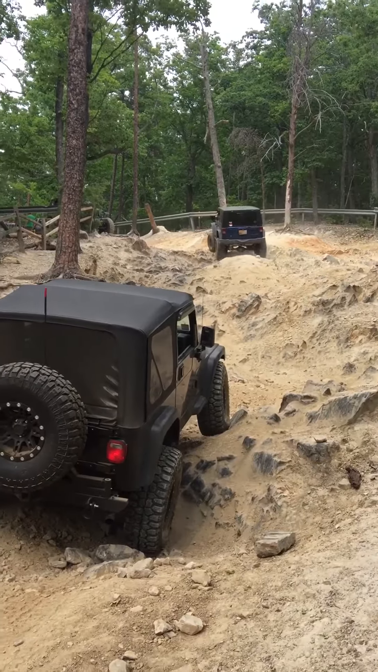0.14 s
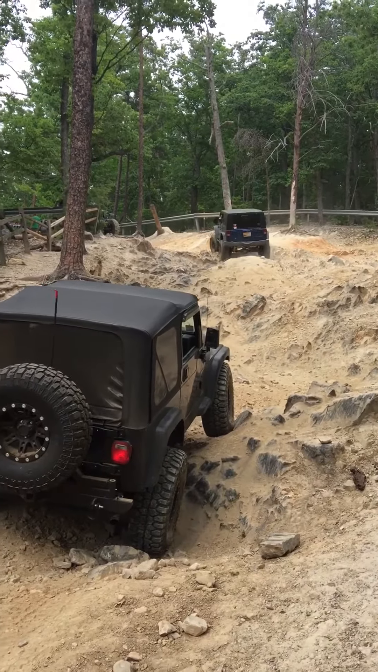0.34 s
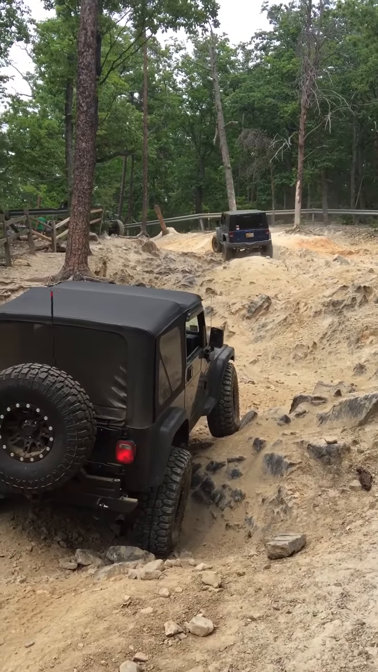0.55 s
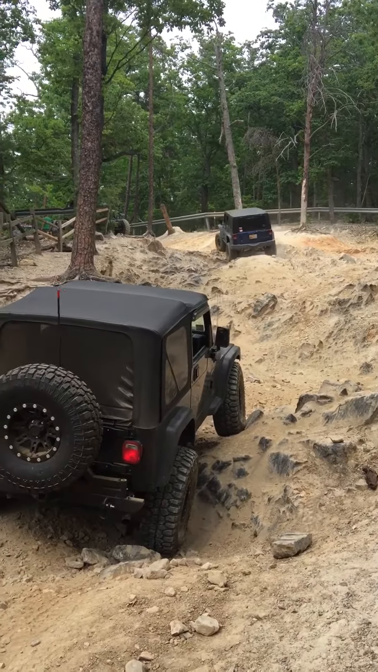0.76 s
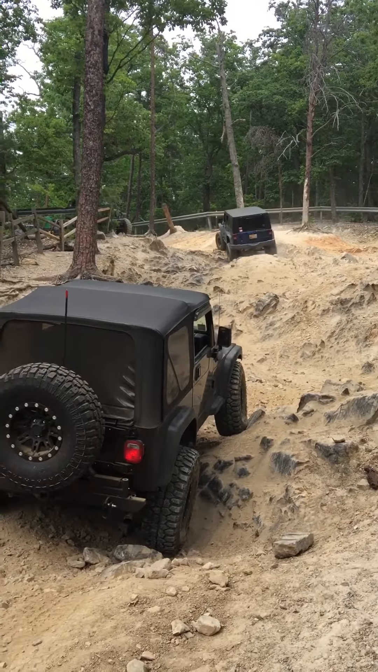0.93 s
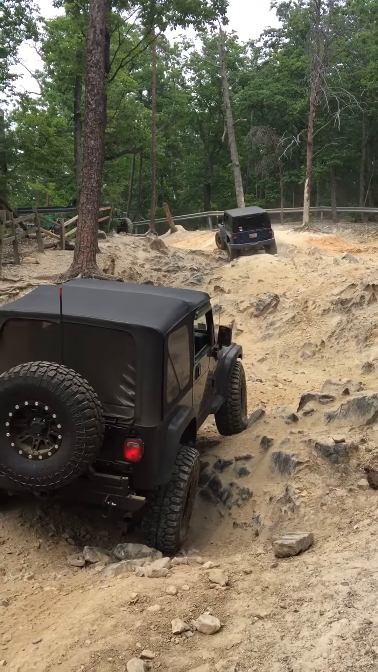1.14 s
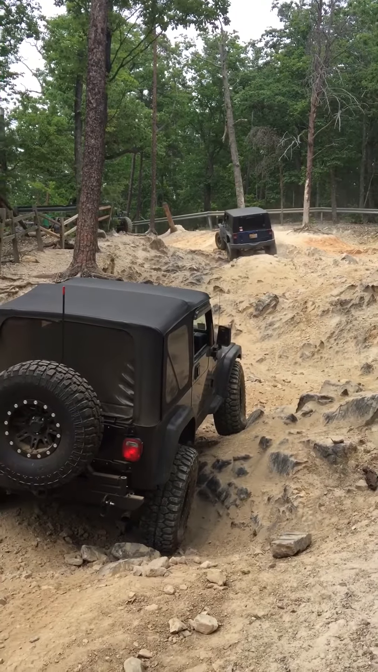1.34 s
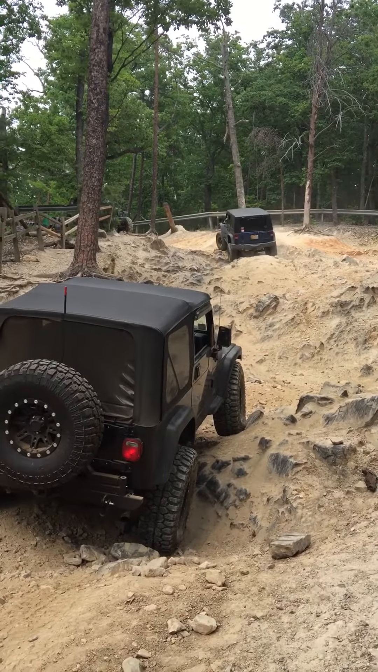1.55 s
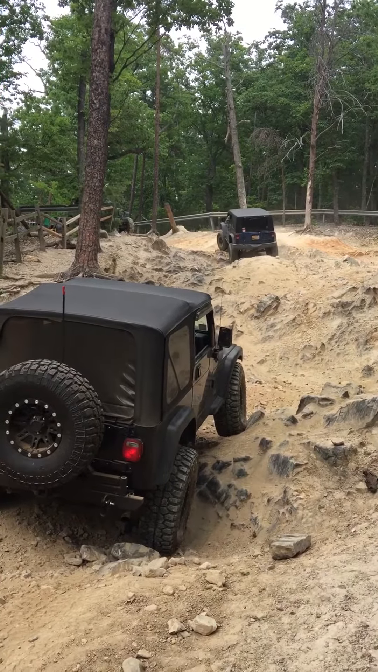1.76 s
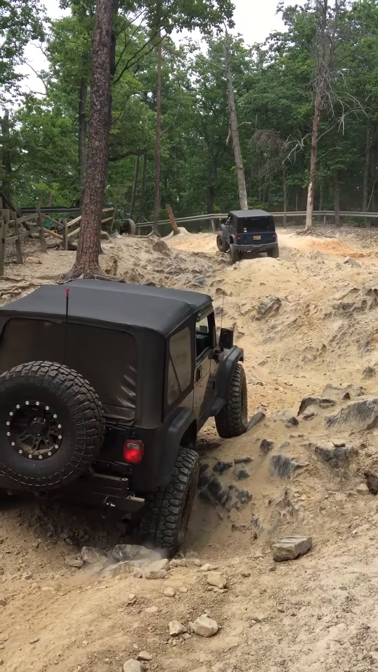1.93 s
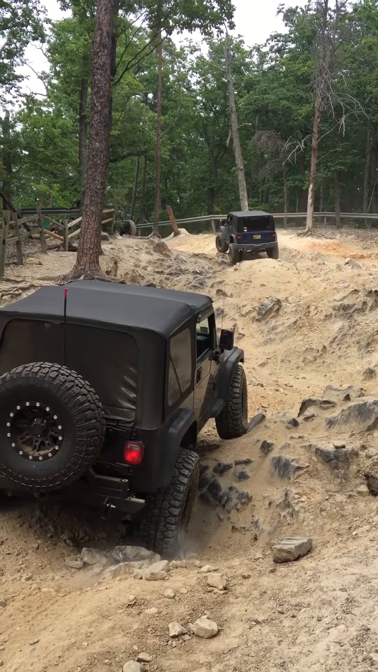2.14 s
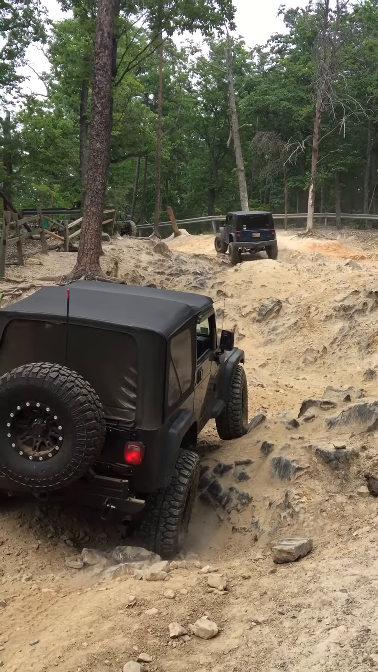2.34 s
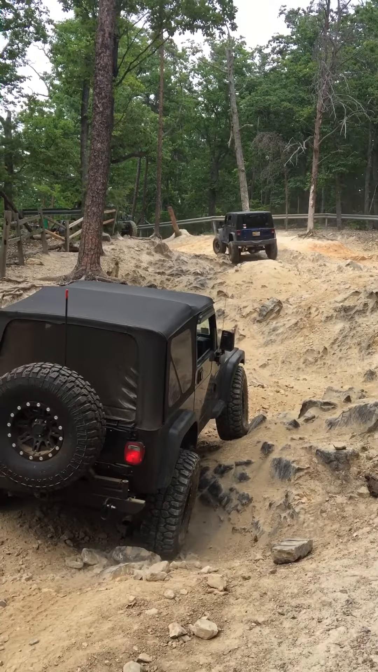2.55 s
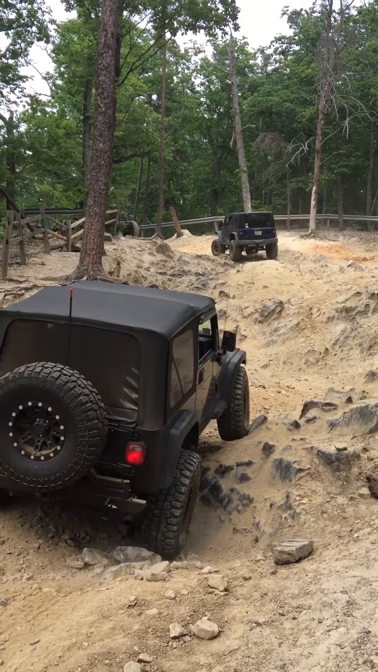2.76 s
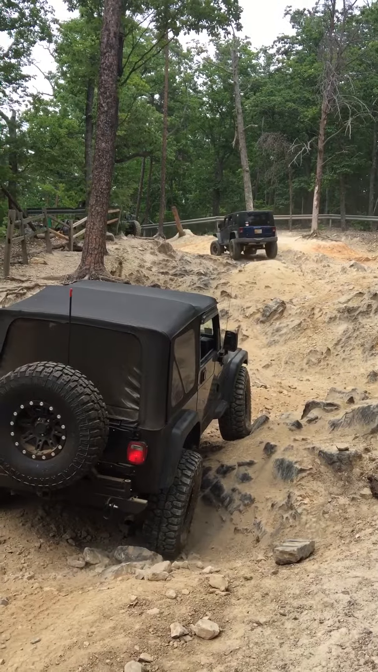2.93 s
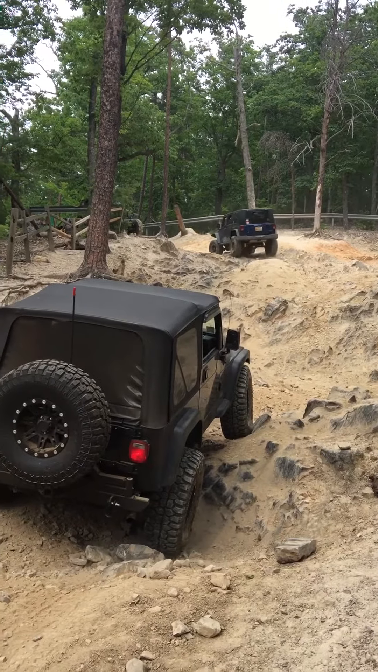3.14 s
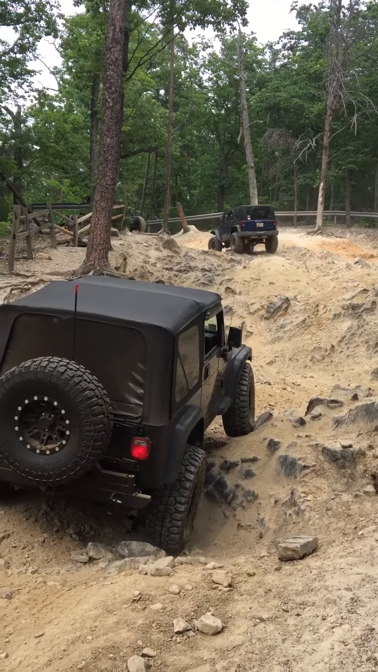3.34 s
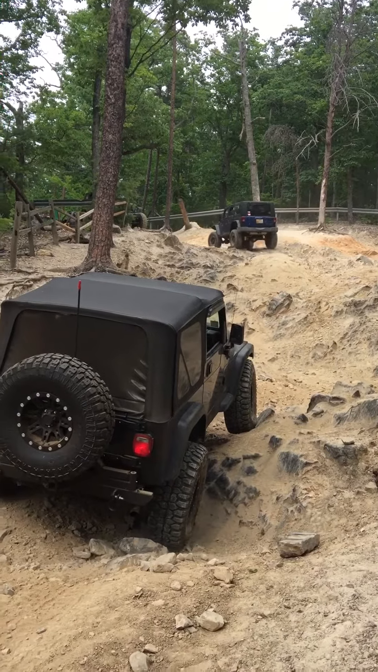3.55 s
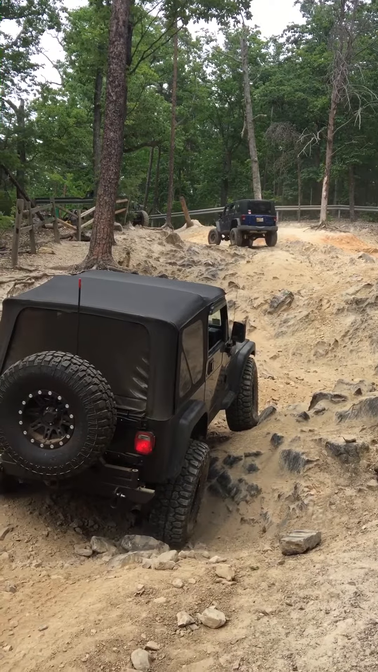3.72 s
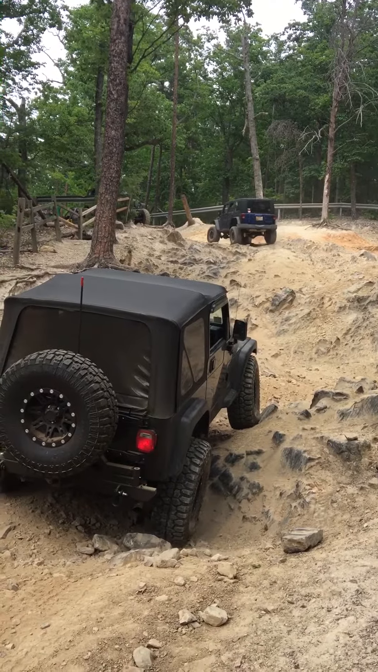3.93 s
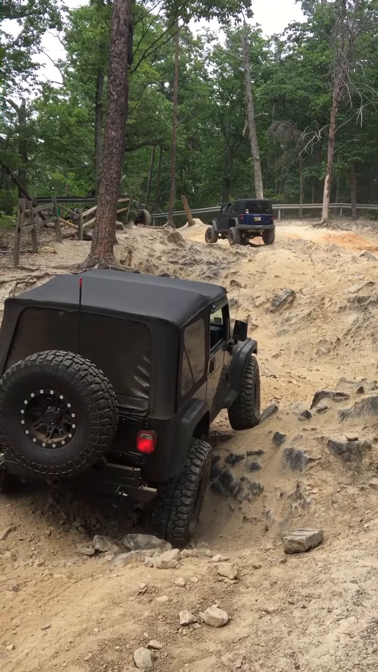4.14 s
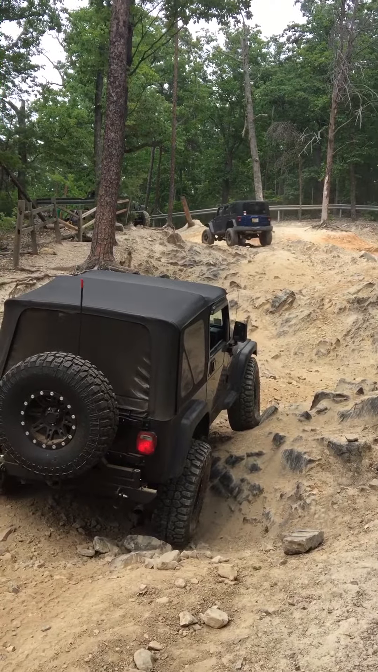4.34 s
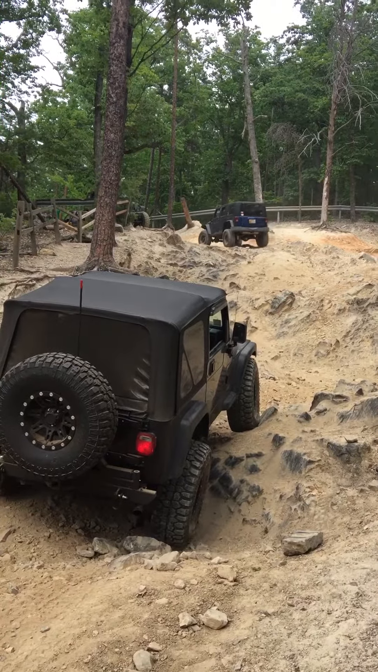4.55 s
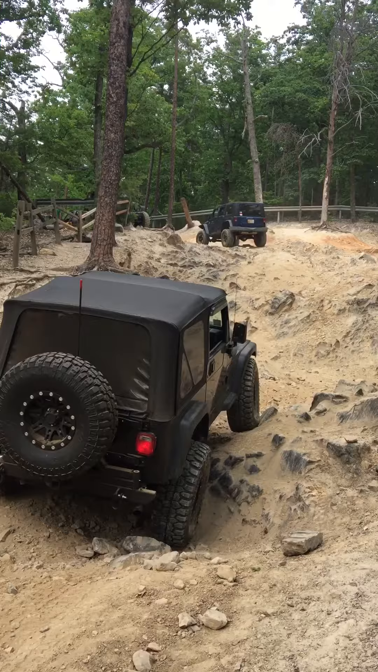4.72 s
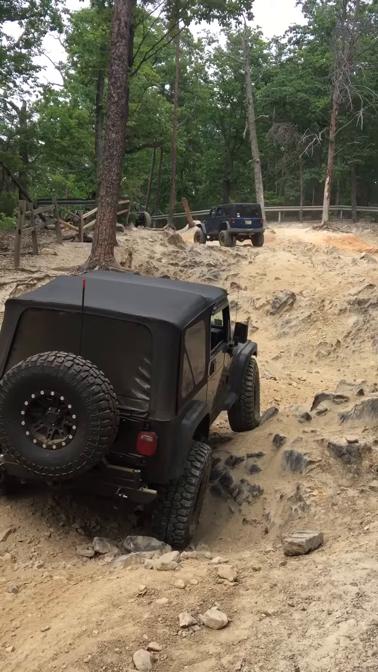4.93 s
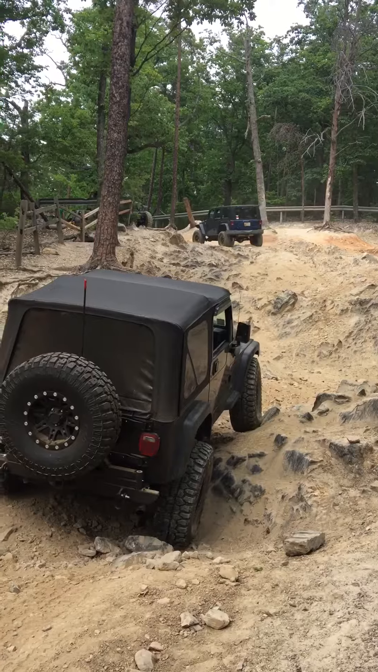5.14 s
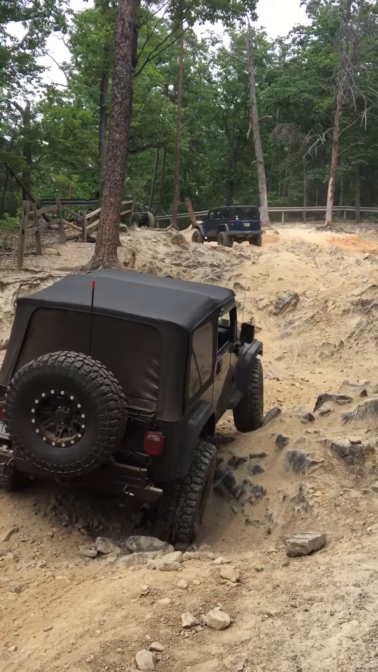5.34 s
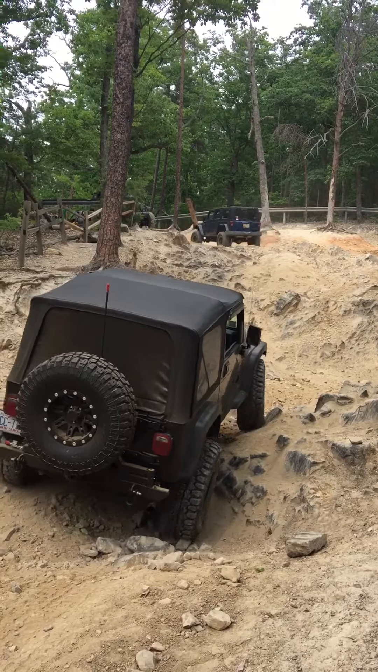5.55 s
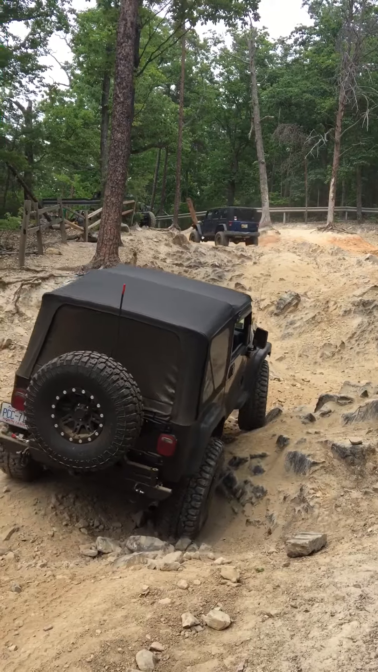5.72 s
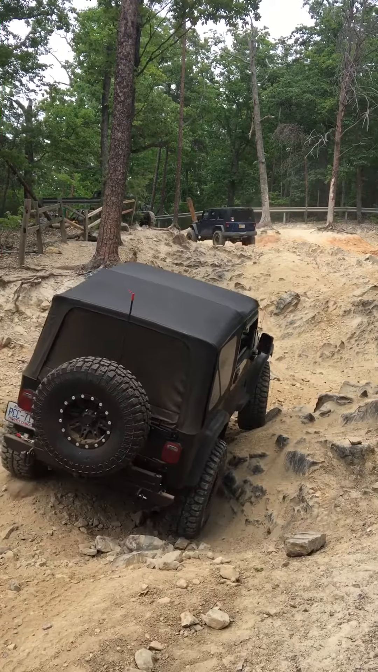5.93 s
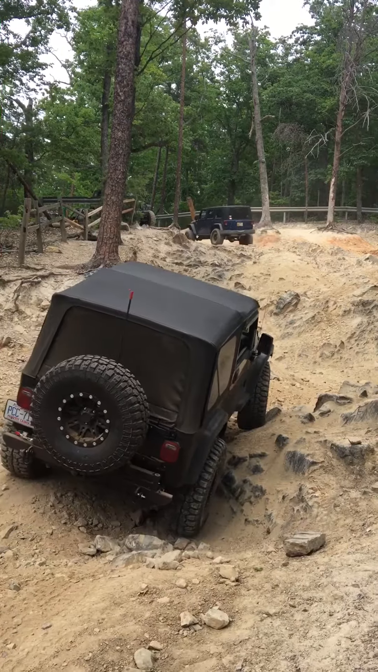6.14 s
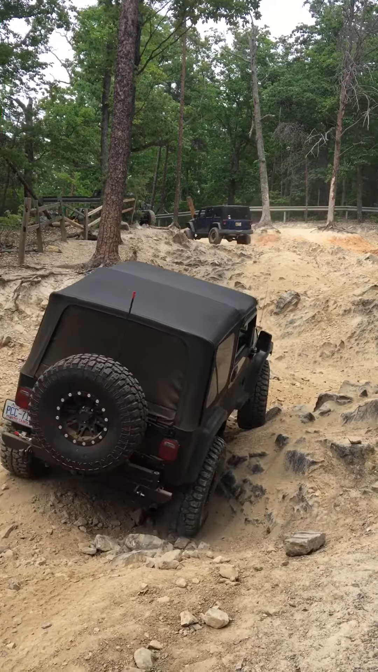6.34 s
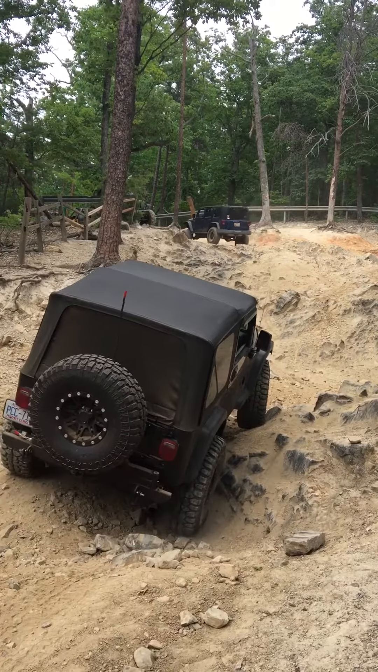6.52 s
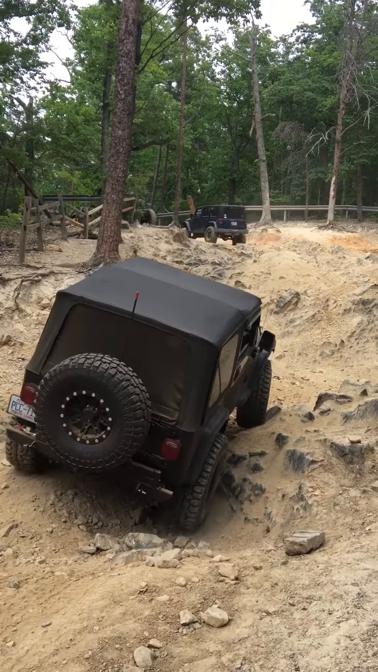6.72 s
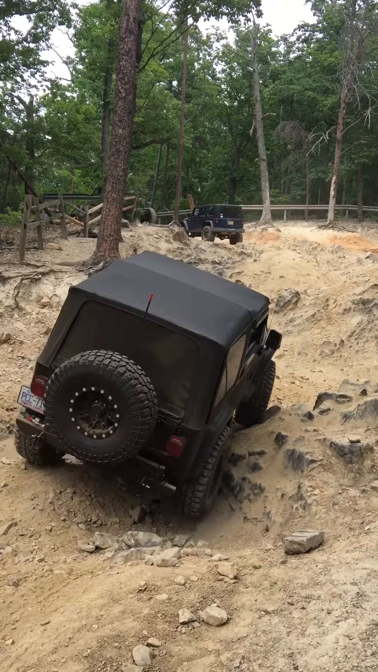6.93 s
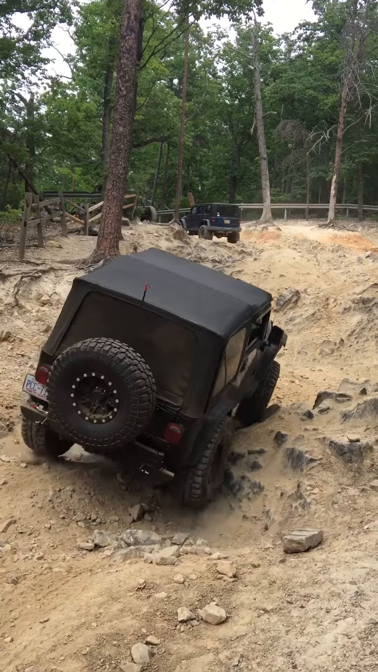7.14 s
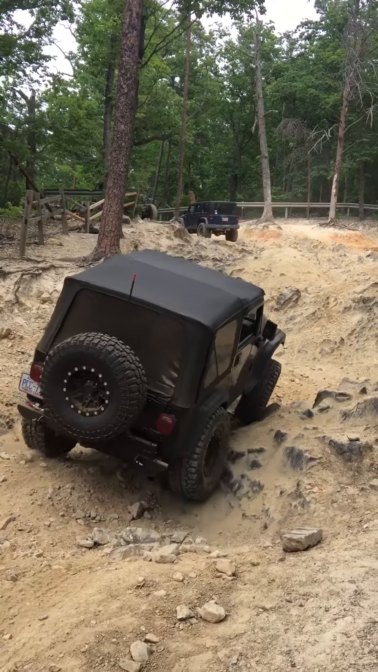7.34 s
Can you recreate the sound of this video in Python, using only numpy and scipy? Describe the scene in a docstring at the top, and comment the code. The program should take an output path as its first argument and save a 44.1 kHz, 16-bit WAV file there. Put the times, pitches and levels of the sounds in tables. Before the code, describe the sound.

An off-road vehicle's six-cylinder engine runs low and stalls within the first second, close by, while the drivetrain settles with small clunks. At about 1.3 seconds the starter bangs in and cranks with a grinding whine. The engine coughs with deep thumps around 1.9 seconds and catches; the starter races, then whines down, chirping until about 4 seconds. The engine rises gently to 3 seconds and sinks to idle, with a booming exhaust and clattering valves. A clunk and a tyre scrape come near 4.7 seconds. From 5.4 seconds the revs climb, peaking around 6.5, as grit crackles and tyres grind over stone, with knocks near 5.9. The engine bogs down after 7 seconds amid more clunks and scraping. Faint, high brake squeaks sound at about 6.5 and 7.3 seconds. Behind lies a faint forest hush, and the rocky slope returns a short, dull echo.

```python
"""A rocky slope in quiet forest, one small microphone close to a six-cylinder off-roader.
The engine stalls and the drivetrain clunks as it settles. The starter bangs in, cranks, overruns
and whines down while the engine catches, revs, idles and revs again. Firing pulses boom in the
exhaust pipe, valves clatter, tyres grind over stone and, near the end, a brake squeaks.
Rocks and trees send a short, dull echo back to the microphone."""
import sys
import numpy as np
from scipy import signal
from scipy.fft import rfft, irfft, next_fast_len
from scipy.io import wavfile
from scipy.ndimage import uniform_filter1d, map_coordinates

SR = 44100
rng = np.random.default_rng(int(sys.argv[2]) if len(sys.argv) > 2 else 0)


def bounce(signal):
    """Save signal as a 16-bit WAV file at the path given by the first command-line argument."""
    frames = np.transpose(np.atleast_2d(signal))
    limited = np.clip(frames, -1, 1)
    pcm = np.round(limited * 32767).astype(np.int16)
    wavfile.write(sys.argv[1], SR, pcm)


N = 325458

# each cylinder's departure from the mean exhaust pulse: fraction
CYLINDER_IMBALANCE = [0.059, 0.14, -0.28, 0.035, 0.055, -0.2]
# the starter labouring over one compression: t/s, whine f/Hz, gear level/dB
COMPRESSION = [(1.32, 2300, -46), (1.39, 3000, -36.5), (1.46, 3620, -40.5), (1.51, 3780, -43),
               (1.56, 3380, -30.5), (1.62, 2890, -31)]
RELEASE_S = 2.36  # the key is let go


def amp(db):
    """Decibels to gain."""
    return 10 ** (np.asarray(db) / 20)


def unit(x):
    """Scale to rms 1."""
    return x / np.sqrt(np.mean(x ** 2) + 1e-20)


def clock():
    """The time of each sample."""
    return np.arange(N) / SR


def curves(rows):
    """One value per sample for each column after the time."""
    times, *columns = np.transpose(rows)
    return [np.interp(clock(), times, column) for column in columns]


def during(rows, fade):
    """1 while a table lasts, fading to 0 outside it."""
    start, end = rows[0][0], rows[-1][0]
    return np.interp(clock(), [start - fade, start, end, end + fade], [0, 1, 1, 0])


def after(s, fade):
    """0, then rising to 1 by time s."""
    return np.interp(clock(), [s - fade, s], [0, 1])


def swell(s, length):
    """A bell-shaped rise and fall of height 1 around time s."""
    return np.exp(-((clock() - s) / length) ** 2)


def wobble(rate):
    """A smooth random curve, rate knots a second."""
    return map_coordinates(rng.standard_normal(int(N * rate / SR) + 4), [clock() * rate])


def filtered(x, response):
    """x through a complex frequency response."""
    size = next_fast_len(N + SR // 2)
    return irfft(rfft(x, size) * response(np.fft.rfftfreq(size, 1 / SR)), size)[:N]


def colour(points):
    """The response through (f/Hz, level/dB) points on a log axis."""
    f, db = np.transpose(points)
    return lambda hz: amp(np.interp(np.log(hz + 1), np.log(f), db, left=-120, right=-120))


def resonances(modes):
    """The response of (f/Hz, width/Hz, level/dB) modes, alternating in sign as along a pipe."""
    return lambda f: sum((-1) ** k * amp(db) * 1j * f * width / (hz * hz - f * f + 1j * f * width)
                         for k, (hz, width, db) in enumerate(modes))


def noise(response):
    """Coloured noise of rms 1."""
    return unit(filtered(rng.standard_normal(N), response))


def band(x, hz, spread):
    """x through one broad resonance, at rms 1."""
    edges = np.clip([hz / (1 + spread), hz * (1 + spread)], 20, SR / 2 - 100)
    return unit(signal.lfilter(*signal.butter(1, edges, "band", fs=SR), x))


def add(track, s, sound):
    """Mix a sound into a track from time s."""
    part = track[max(round(s * SR), 0):][:len(sound)]
    part += sound[:len(part)]


def metallic(x, ring_db, t60):
    """x plus its ring in many small steel parts, at rms 1."""
    t = np.arange(SR // 8) / SR
    tail = rng.standard_normal(len(t)) * amp(-60 * t / t60)
    return unit(x + amp(ring_db) * signal.fftconvolve(x, tail / np.linalg.norm(tail))[:N])


def taps(turns, per_turn, scatter_db, decay):
    """An envelope of mean 0 from sharp, regular taps of unequal force."""
    hits = np.diff(np.floor(turns * per_turn), prepend=0) * amp(scatter_db * rng.standard_normal(N))
    envelope = signal.lfilter([1], [1, -np.exp(-1 / (decay * SR))], hits)
    return envelope - uniform_filter1d(envelope, SR // 5)


def exhaust(firing_hz, firings, order_dbs, load_db):
    """Even firing gives the drone; unequal cylinders add a lope that rings in the pipe."""
    # exhaust pipe modes: f/Hz, width/Hz, level/dB
    pipe_modes = [(60.29, 4.9, 0), (114.8, 71.3, -3.5), (151.6, 19, 7), (185, 13, -5.5), (277.5, 14, -12),
                  (313.5, 51.5, -21), (434.8, 88, -26), (572, 66, -24)]
    # harmonics above the drone: firing order, level/dB
    upper_orders = [(4, -1.5), (5, 6), (6, -8), (7, -12.5)]
    # uneven firing as the engine bogs down: t/s, length/s, extra pulse scatter
    stumbles = [(2.052, 0.046, 0), (7.2, 0.23, 0.37)]
    pipe = lambda f: resonances(pipe_modes)(f) / (1 + (f / 400) ** 2)  # the muffler swallows treble
    grid_hz = np.arange(1000.)
    passed = lambda k: np.interp(k * firing_hz, grid_hz, pipe(grid_hz))
    phase = 2 * np.pi * firings
    drone = sum(amp(db) * np.sqrt(2) * np.cos(k * phase + np.angle(passed(k)))
                for k, db in enumerate(order_dbs, 1))
    upper = sum(amp(db + 9.5 + wobble(18)) * np.real(passed(k) * np.exp(1j * k * phase))
                for k, db in upper_orders)
    scatter = 0.045 + sum(size * swell(s, length) for s, length, size in stumbles)
    fired = np.flatnonzero(np.diff(np.floor(firings)))
    pulses = np.zeros(N)
    pulses[fired] = np.resize(CYLINDER_IMBALANCE, len(fired))
    pulses[fired] += scatter[fired] * rng.standard_normal(len(fired))
    lope = unit(filtered(pulses, pipe))
    gas = noise(resonances([(268.7, 13.8, 0), (198.5, 20, 0)]))  # the gas stream sounds the pipe too
    return drone * amp(0.63 * wobble(16)) + amp(load_db) * (upper + lope + amp(-10.5) * gas)


def engine_bay(firing_hz, firings, clatter_db, hiss_db):
    """Valves tap with the crank and ring the block; fan and intake hiss, and whistle at high revs."""
    # spectra of valve clatter and of fan and intake air: f/Hz, level/dB
    clatter_spectrum = [(200, -9), (330, 1.5), (470, 6.5), (640, 4.5), (850, -0.5), (1450, 1), (2800, -2.5),
                        (3500, -8.5), (5000, -50), (8000, -46)]
    hiss_spectrum = [(2500, -27), (3500, 0.5), (4500, 1), (4950, -7.5), (5700, -1), (6600, 1), (7600, -4),
                     (9400, -5.5), (10300, -10), (11500, -8.5), (15800, -18)]
    # resonances of the block and of the intake: f/Hz, width/Hz, level/dB
    block_modes = [(640, 110, 9), (976, 34, -4.5), (1226, 50, -5), (1400, 130, -7), (2380, 100, -10)]
    intake_modes = [(1237, 34, 2), (1408, 35, -3.5), (6280, 99, -12), (6760, 120, -9.5)]
    phase = 2 * np.pi * firings
    beat = 1 + 0.11 * np.cos(phase) + 0.049 * np.cos(phase / len(CYLINDER_IMBALANCE))
    valves = taps(firings, per_turn=2, scatter_db=4.0, decay=0.0056)
    steel = metallic(noise(colour(clatter_spectrum)), ring_db=-4.5, t60=0.052)
    block = amp(-6.5) * noise(resonances(block_modes))
    clatter = amp(clatter_db - 2.5) * (steel + block) * (1 + 0.5 * valves)
    hiss = amp(hiss_db) * noise(colour(hiss_spectrum)) * (1 + 0.4 * valves)
    whistle = amp(-51.5) * (firing_hz / 80) ** 4 * noise(resonances(intake_modes))
    return beat * (clatter + hiss + whistle)


def engine():
    """Speed, effort and throttle drive exhaust and engine bay, first stalling, then running again."""
    # the engine stalling, then under its own power: t/s, firing f/Hz, effort level/dB
    stall = [(0, 41.9, -45.5), (.32, 42, -48.5), (.46, 36.83, -59), (.8, 31.35, -77)]
    run = [(2.12, 39.67, -35.5), (2.24, 47.25, -32.5), (2.88, 54.9, -33), (3.09, 56.2, -32),
           (3.36, 53.1, -32.5), (3.95, 45.54, -35), (4.21, 43.4, -37), (5.0, 43.93, -35.5),
           (5.23, 40.44, -38), (5.37, 44.04, -35.5), (5.77, 57.84, -29.5), (6.12, 73.6, -29),
           (6.32, 80.45, -28.5), (6.47, 84.04, -28.5), (6.63, 80.76, -28), (6.85, 73.4, -29.5),
           (7.01, 66.17, -32), (7.14, 53.4, -38.5), (7.25, 43.2, -38.5), (7.38, 39.96, -43)]
    # the drone ahead of the tailpipe: firing order, cruising level/dB, dB per dB of effort
    drone_orders = [(1, -26.5, 3), (2, -21, 1), (3, -27.5, 0.63)]
    # the tailpipe booms as an order passes 150 Hz: f/Hz, gain/dB
    tailpipe = [(30, 17), (86, -7.5), (108, 1.5), (130, 2.5), (142, 2.5), (151, 7), (162, -1.5), (170, -3),
                (196, -9), (225, -25.5), (300, -15)]
    # the engine bay running down: t/s, clatter level/dB, hiss level/dB
    bay_dying = [(0, -59.5, -71.5), (.55, -55.5, -72.5), (.72, -62, -76), (1.2, -67, -83)]
    # the throttle, heard as intake hiss: t/s, level/dB
    throttle = [(2.44, -51), (2.9, -55.5), (3.6, -58), (4.1, -64), (4.55, -66.5), (5.15, -67), (5.4, -58.5),
                (5.75, -57), (6.45, -52), (7.08, -57.5), (7.26, -63.5)]
    cruise_db, idle_hz, half_throttle_db = -30, 43, -59
    firing_hz, level_db = curves(list(stall) + list(run))
    firings = np.cumsum(firing_hz) / SR
    effort_db = level_db - cruise_db
    caught = after(2.12, fade=0.15)
    blend = lambda stalling, running: stalling + caught * (running - stalling)

    _, stall_db = curves(stall)
    order_dbs = []
    for stall_offset_db, (order, db, growth) in zip([-14, 3, -16], drone_orders):
        boom_db = 20 * np.log10(colour(tailpipe)(order * firing_hz))
        order_dbs.append(blend(stall_db + stall_offset_db, db + growth * effort_db + boom_db))
    load_db = blend(stall_db - 5.5, -34 + 0.59 * effort_db)

    dying_clatter_db, dying_hiss_db = curves(bay_dying)
    throttle_db, = curves(throttle)
    clatter_db = -45 + 2.4 * np.log2(firing_hz / idle_hz) + 0.33 * (throttle_db - half_throttle_db)
    bay = engine_bay(firing_hz, firings, blend(dying_clatter_db, clatter_db),
                     blend(dying_hiss_db, throttle_db))
    return exhaust(firing_hz, firings, order_dbs, load_db) + bay


def forest():
    """A faint, low, steady hush around the microphone."""
    # forest ambience: f/Hz, level/dB
    spectrum = [(35, 8), (80, 13), (200, 3), (420, -5), (700, -10), (1500, -30.5), (5000, -23.5),
                (15800, -40)]
    return amp(-54.5) * noise(colour(spectrum))


def tyre_scrapes():
    """A slipping tyre crushes grit in a brief swell of grains."""
    # tyres grinding on stone: t/s, length/s, level/dB, centre f/Hz
    slips = [(.15, 0.93, -57.5, 587), (0.28, 0.024, -63, 5500), (.568, 0.093, -53.5, 685),
             (4.791, 0.055, -42, 660), (5.901, 0.049, -42, 2160), (5.95, .03, -39.5, 1310),
             (5.957, 0.016, -44.5, 5000), (7.035, 0.016, -48, 2600), (7.095, 0.017, -52, 5170),
             (7.173, 0.071, -40, 2240)]
    out, t = np.zeros(N), np.arange(-SR // 5, SR // 5) / SR
    for s, length, db, hz in slips:
        grains = rng.standard_normal(len(t)) * (rng.random(len(t)) < 0.2)
        crunch = band(band(grains, hz, spread=0.3), hz, spread=0.28)
        add(out, s + t[0], amp(db) * np.exp(-2 * (t / length) ** 2) * crunch)
    return out


def slope_echo(x):
    """Nearby rocks and trees scatter a short, dull answer."""
    t = np.arange(SR // 2) / SR
    tail = band(rng.standard_normal(len(t)), 860, spread=5.5) * amp(-60 * t / 0.12) * (t > 0.012)
    return signal.fftconvolve(x, tail / np.linalg.norm(tail))[:N]


def clunks():
    """Slack parts take up load: short, dense, damped rings."""
    # knocks of drivetrain and suspension: t/s, level/dB, centre f/Hz, t60/s
    knocks = [(0.464, -42.5, 200, 0.08), (0.5, -44.5, 2170, 0.044), (0.674, -42, 610, 0.054),
              (.753, -41, 850, 0.067), (.788, -41, 890, 0.03), (0.838, -45, 480, 0.13),
              (0.856, -50, 1610, 0.067), (1.015, -54, 640, 0.059), (1.037, -45, 530, .055),
              (1.107, -47.5, 784, 0.064), (4.647, -35.5, 593.2, 0.057), (5.802, -35.5, 568, 0.19),
              (5.861, -33, 1369, 0.075), (5.936, -32.5, 581, 0.2), (7.101, -31.5, 446.8, 0.13),
              (7.14, -31, 405, 0.15), (7.181, -35, 439.8, 0.72), (7.295, -42, 602, 0.075)]
    out, t = np.zeros(N), np.arange(SR // 4) / SR
    for s, db, hz, t60 in knocks:
        strike = rng.standard_normal(len(t))
        strike[0] = 8  # the contact itself
        ring = band(band(strike, hz, spread=0.36), hz, spread=0.48)
        add(out, s, amp(db - 60 * t / t60) * ring * (1 - np.exp(-t / 0.00063)))
    return signal.lfilter(*signal.butter(2, 5000, fs=SR), out)  # heavy parts make little treble


def starter_gears():
    """The pinion bangs in, grinds on the flywheel and rattles as the engine overruns it."""
    # the pinion strikes the flywheel: t/s, level/dB, t60/s
    strikes = [(1.253, -44, .1), (1.263, -19, 0.055), (1.291, -27, 0.067)]
    # the gears take a strain: t/s, length/s, extra grind/dB, extra rattle/dB
    strains = [(1.555, 0.092, 5.5, 4.5), (1.866, 0.062, 3.5, 0), (2.162, 0.12, 6, 7),
               (2.331, 0.076, 2.5, 7)]
    # spectra of the teeth striking, grinding and rattling: f/Hz, level/dB
    bang_spectrum = [(250, -28), (585, -1), (1000, -3.5), (2200, -1.5), (3000, -14.5), (4500, -1.5),
                     (5400, -20), (6400, -12), (15800, -28)]
    grind_spectrum = [(200, -11.5), (420, 6), (620, 9), (850, 3), (1400, 3.5), (1950, 5.5), (2900, -3.5),
                      (4500, -7), (7000, -20)]
    rattle_spectrum = [(1500, 2), (2200, 2), (4200, -5), (5000, -9.5), (6700, -1), (9000, -6), (10600, -12),
                       (12000, -10.5), (15800, -24.5)]
    mesh_s, disengage_s = 1.308, 2.457
    bite_db = 13.5 * np.exp(-np.maximum(clock() - mesh_s, 0) / 0.13)
    grind_db = -45 + bite_db + sum(db * swell(s, length) for s, length, db, _ in strains)
    rattle_db = -47 + sum(db * swell(s, length) for s, length, _, db in strains)
    teeth = 1 + 0.19 * taps(clock() + 0.0043 * wobble(60), per_turn=310, scatter_db=6.5, decay=0.0068)
    grind = amp(grind_db) * metallic(noise(colour(grind_spectrum)), ring_db=-4, t60=0.11)
    rattle = amp(rattle_db) * noise(colour(rattle_spectrum))
    blows, t = np.zeros(N), np.arange(SR // 3) / SR
    for s, db, t60 in strikes:
        add(blows, s, amp(db - 60 * t / t60))
    bang = metallic(noise(colour(bang_spectrum)), ring_db=4.5, t60=0.019)
    meshed = after(mesh_s, fade=0.061) * (1 - after(disengage_s, fade=0.053))
    return meshed * teeth * (grind + rattle) + blows * bang


def starter_pitch():
    """Whine in Hz: held down by the engine, rising towards free speed, then slowed by friction."""
    free_hz, spin_up_s, coast_hz_per_s = 6937, 0.32, 3020
    loaded_hz, _ = curves(COMPRESSION)
    freed_s = COMPRESSION[-1][0]
    racing = 1 - np.exp(-(np.clip(clock(), freed_s, RELEASE_S) - freed_s) / spin_up_s)
    lost_hz = coast_hz_per_s * np.maximum(clock() - RELEASE_S, 0)
    return np.maximum(loaded_hz + (free_hz - loaded_hz) * racing - lost_hz, 0)


def starter_whine():
    """The motor labours against compression, races once freed, then coasts down."""
    # how the casing radiates the whine: f/Hz, gain/dB
    housing = [(500, -18), (1500, -9), (1950, 1.5), (2250, 4), (2750, 7), (2950, 2.5), (3600, 8),
               (4200, -2), (5400, -1), (7000, -9.5)]
    # the coasting starter chirps, then sings out: t/s, length/s, extra level/dB
    chirps = [(3.594, 0.013, 12), (3.634, .014, 7), (3.678, 0.012, 10.5), (3.8, .08, 9.5)]
    driven_db, coasting_db, flutter_hz = -45.5, -58.5, 20
    hz = starter_pitch()
    _, gear_db = curves(COMPRESSION)
    gear_gain = during(COMPRESSION, fade=0.037) * amp(gear_db)
    whine_db = driven_db + (coasting_db - driven_db) * after(RELEASE_S + 0.1, fade=0.1)
    whine_db += sum(db * swell(s, length) for s, length, db in chirps)
    whine_db -= 8 * during(COMPRESSION, fade=0.028)
    whine_gain = after(COMPRESSION[0][0], fade=0.032) * amp(whine_db) * colour(housing)(hz)

    # the harder it sings, the more the pinion chatters
    chatter = amp(44) * np.maximum(whine_gain, amp(-12) * gear_gain)
    phase = 2 * np.pi * np.cumsum(hz + 70 * chatter * wobble(700) + flutter_hz * wobble(250)) / SR
    overtone = filtered(np.sin(2 * phase), colour([(5000, -21), (6400, 2), (15800, -4)]))
    flicker = lambda: amp(5 * np.tanh(1.5 * wobble(32)) + 2 * wobble(110) - 1)
    whine = flicker() * np.sin(phase) + amp(-9) * flicker() * overtone
    mesh_phase = phase / 3
    gear = sum(amp(db) * np.sin(k * mesh_phase) for k, db in [(1, -12), (2, 0), (4, -18.5), (5, -22.5)])
    return whine_gain * whine + gear_gain * amp(3.1 * wobble(120)) * gear


def cranking_puffs():
    """Unfired cylinders pump air through the pipe, which booms."""
    # puffs of air in the pipe: t/s, length/s, level/dB
    puffs = [(1.324, 0.014, -33), (1.409, 0.053, -32.5), (1.5, 0.029, -37), (1.614, 0.033, -38),
             (1.832, 0.043, -26.5), (1.924, 0.018, -34)]
    airflow = sum(amp(db) * swell(s, length) for s, length, db in puffs)
    boom_hz = 188 * (1 + 0.029 * wobble(49.7))
    boom = np.sqrt(2) * np.sin(2 * np.pi * np.cumsum(boom_hz) / SR)
    rumble = noise(colour([(40, -19), (70, -5.5), (110, -11.5), (200, -4.5), (300, -27), (400, -47)]))
    return during(puffs, fade=0.074) * (airflow * boom + amp(-39.5) * rumble)


def coughs():
    """The first firings thump singly out of the tailpipe."""
    # cylinders catching: t/s, level/dB
    first_firings = [(1.886, -17), (1.907, -23), (1.934, -14.5), (1.951, -49), (1.977, -17.5), (2.027, -14),
                     (2.045, -16), (2.072, -13)]
    out, t = np.zeros(N), np.arange(SR // 8) / SR
    thump = np.sin(2 * np.pi * 58 * t) * amp(-60 * t / 0.095)
    ring = 0.48 * np.sin(2 * np.pi * 155 * t) * amp(-60 * t / 0.14)
    for s, db in first_firings:
        add(out, s, amp(db) * (thump + ring) * (1 - np.exp(-t / 0.0058)))
    return out


def ring_and_squeaks():
    """A faint, steady 1 kHz ring as the engine picks up, then two brief, high, falling squeaks."""
    # the ring and the two squeaks: t/s, length/s, level/dB, start f/Hz, end f/Hz
    tones = [(2.302, 0.98, -55.5, 999, 986), (6.507, .048, -53, 12310, 11660),
             (7.303, 0.083, -60, 7100, 6307)]
    out = np.zeros(N)
    for s, length, db, start_hz, end_hz in tones:
        hz = np.linspace(start_hz, end_hz, int(length * SR))
        add(out, s, amp(db) * np.hanning(len(hz)) * np.sin(2 * np.pi * np.cumsum(hz) / SR))
    return out * amp(4.34 * wobble(200))


def gravel():
    """Single grains crack under the tread while the vehicle rolls."""
    # grit under the tyres: t/s, level/dB
    grit = [(5.25, -59.5), (5.9, -60.5), (6.4, -62), (7.05, -57), (7.2, -89)]
    cracks_per_s, decay_s = 90, 0.007
    grit_db, = curves(grit)
    cracks = (rng.random(N) < cracks_per_s / SR) * amp(2.5 * rng.standard_normal(N))
    bursts = signal.lfilter([1], [1, -np.exp(-1 / (decay_s * SR))], cracks) * rng.standard_normal(N)
    crackle = unit(filtered(bursts, colour([(2500, -17), (6300, 1), (9000, -10), (15800, -35)])))
    return during(grit, fade=0.056) * amp(grit_db) * crackle


def scene():
    """At the microphone, in mono: the vehicle, the echo of its sharper sounds and the forest."""
    metal = starter_whine() + starter_gears() + clunks() + ring_and_squeaks()
    sharp = metal + tyre_scrapes() + gravel()
    vehicle = engine() + coughs() + cranking_puffs() + sharp
    return (vehicle + amp(-12) * slope_echo(sharp) + forest())[None]


def record(dry):
    """The small microphone sheds the deepest bass and keeps nothing above its band limit."""
    low_hz, top_hz = 33, 15800
    low_cut = signal.sosfilt(signal.butter(4, low_hz, "high", fs=SR, output="sos"), dry[0])
    return filtered(low_cut, lambda hz: hz < top_hz)[None]


dry = scene()
out = record(dry)
bounce(out)
```